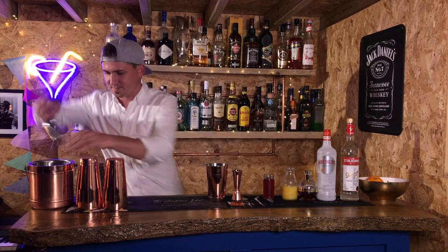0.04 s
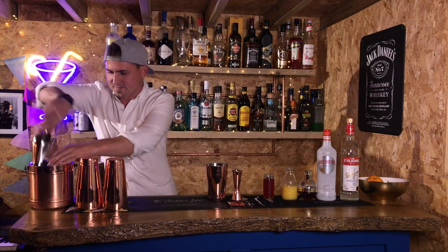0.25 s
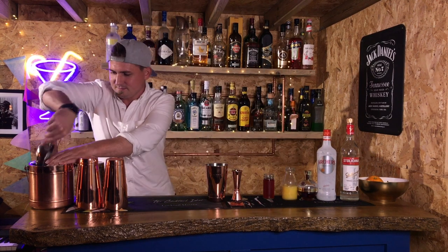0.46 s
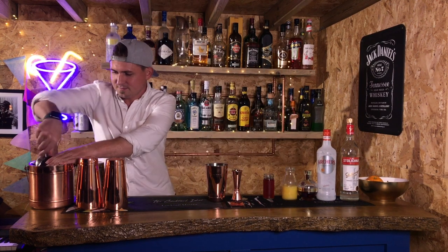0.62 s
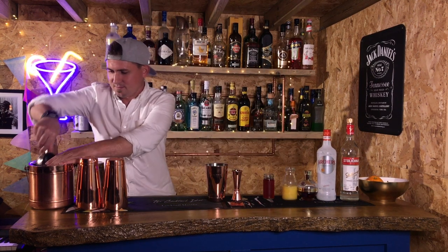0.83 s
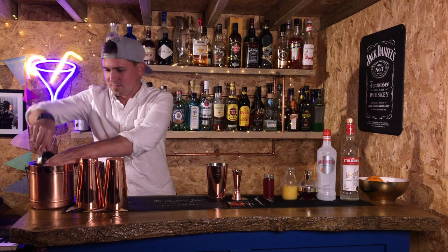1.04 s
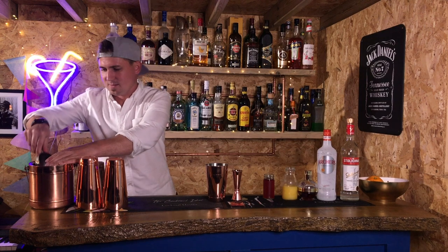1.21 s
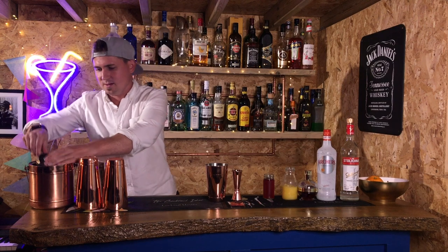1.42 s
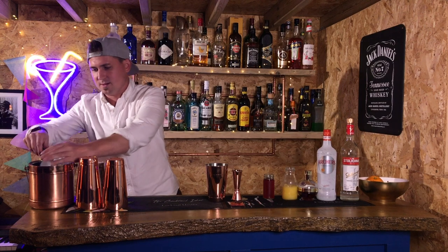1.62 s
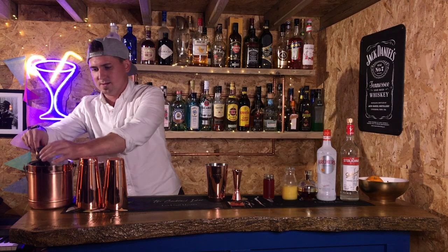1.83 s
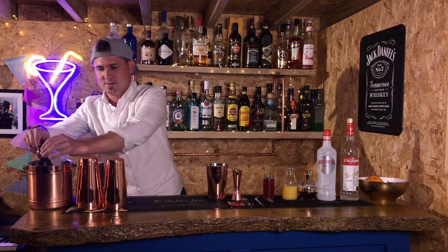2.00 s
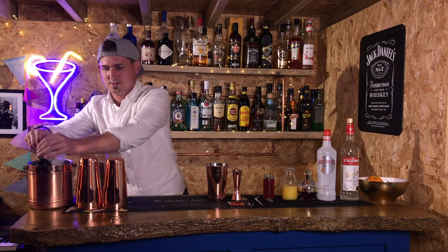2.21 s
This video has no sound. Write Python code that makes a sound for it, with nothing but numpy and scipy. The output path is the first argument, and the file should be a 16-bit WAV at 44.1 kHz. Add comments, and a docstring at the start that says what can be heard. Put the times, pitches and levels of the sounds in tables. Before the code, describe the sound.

Ice cubes clatter in a metal bucket as a steel scoop lands with a bright clang, digs through them with hollow thuds and tinkles, then eases off as the cubes settle. The sound is close, in a small bar.

```python
"""A steel scoop is plunged into a metal bucket of ice cubes in a small bar.
It lands with a bright clang, digs through the clattering cubes for a second and a half, and is lifted
as the last ones settle. Every contact mixes a hollow thud of the bucket, a clack of ice and a bright
crack of steel. Heavy blows boom, splinters tinkle, and the wooden counter bumps and rumbles."""
import sys
import numpy as np
from scipy import signal
from scipy.fft import rfft, irfft
from scipy.io import wavfile

SR = 44100
rng = np.random.default_rng(int(sys.argv[2]) if len(sys.argv) > 2 else 0)


def generate_wav(sig):
    """Save sig (samples, or channels by samples) to the path in sys.argv[1] as 16-bit PCM at SR."""
    pcm = np.round(np.clip(np.atleast_2d(sig).T, -1, 1) * 32767).astype(np.int16)
    wavfile.write(sys.argv[1], SR, pcm)


N = 103635
TIME = np.arange(N) / SR
AGE = TIME[:SR // 3]   # seconds since a contact
TOP_HZ = 15800

def from_db(db):
    """Turn decibels into a volume factor."""
    return 10 ** (np.asarray(db) / 20)

def unit_power(x):
    """Scale a signal to an average power of one."""
    return x / np.sqrt(np.mean(x ** 2) + 1e-20)

def noise(colour, size):
    """Noise shaped by a colour: a list of how strong each frequency is."""
    hz, db = np.transpose(colour)
    gain = from_db(np.interp(np.log(np.fft.rfftfreq(size, 1 / SR) + 1), np.log(hz), db))
    return unit_power(irfft(rfft(rng.standard_normal(size)) * gain, size))

def fade(fade_s):
    """Die away by 60 dB in the given fade time."""
    return from_db(-60 * AGE / fade_s)

def add(track, start, sound):
    """Mix a sound in at a start time in seconds."""
    i = int(start * SR)
    track[i:i + len(sound)] += sound[:max(N - i, 0)]

def band(x, low_hz, high_hz):
    """Soften everything outside a frequency range."""
    return signal.sosfilt(signal.butter(2, [low_hz, high_hz], "band", fs=SR, output="sos"), x)

def tones(table):
    """The fading tones of a struck object, one per row; together they start at a power of one."""
    power = sum(from_db(db) ** 2 for _, db, _ in table) / 2
    waves = [from_db(db) * np.sin(2 * np.pi * hz * AGE) * fade(fade_s) for hz, db, fade_s in table]
    return np.array(waves) / np.sqrt(power)

def strike(body):
    """Each contact sets an object's tones ringing in a mix of its own."""
    return (rng.choice([-1, 1], len(body)) * rng.uniform(.5, 1.5, len(body))) @ body

def ring_out(hits, table):
    """Metal rings with all its tones after each hit."""
    out, body = np.zeros(N), tones(table)
    for start, db in hits:
        add(out, start, from_db(db) * (rng.choice([-1, 1], len(body)) @ body))
    return out

# Each row: frequency in Hz, relative level in dB.
HUSH_COLOUR = [(22, -30), (70, -1), (161, 0), (499, -10), (9220, -13), (16000, -19)]
# Each row: time in seconds, level in dB.
HUSH_LEVELS = [(0, -50), (.23, -47.5), (2.3, -57)]
def room_hush():
    """The room's faint background noise swells a little, then sinks."""
    return from_db(np.interp(TIME, *np.transpose(HUSH_LEVELS))) * noise(HUSH_COLOUR, N)

# Each row: start in seconds, level in dB.
BUMPS = [(.05, -34), (.075, -35), (.909, -21), (1.7655, -24)]
# Each row: frequency in Hz, relative level in dB.
BUMP_COLOUR = [(25, -23), (150, 0), (300, -3), (750, -10), (4000, -55)]
def bumps(fade_s=.09, rise_s=.002):
    """The bucket shifts on the wooden counter with dull bumps."""
    out = np.zeros(N)
    envelope = fade(fade_s) * (1 - np.exp(-AGE / rise_s))
    for start, db in BUMPS:
        add(out, start, from_db(db) * noise(BUMP_COLOUR, len(AGE)) * envelope)
    return band(out, 65, 3000)

# Each row: start in seconds, level in dB.
CLANGS = [(.2422, -15), (.3935, -33), (1.4695, -30), (2.0605, -39)]
# Each row: pitch in Hz, relative level in dB, fade time in seconds.
SCOOP_TONES = [(640, -3, .09), (880, 0, .08), (1410, -1, .22), (1911, -7.5, .39), (2309, -.5, .55),
               (3989, -7, .33), (4301, -8, .36), (7284, -3, .2), (9281, -2, .18), (11360, -8, .13)]
def scoop_clangs():
    """The scoop's steel blade is struck and rings out."""
    return ring_out(CLANGS, SCOOP_TONES)

# Each row: start in seconds, pitch in Hz, level in dB.
BOOMS = [(.2422, 535, -26), (.761, 482, -16), (.911, 436, -15.5), (1.032, 424, -17), (1.129, 490, -21),
         (1.256, 460, -19), (1.7655, 425, -15)]
def booms(fade_s=.19):
    """A heavy blow makes the air in the bucket boom, lower when the scoop is deep in it."""
    out = np.zeros(N)
    for start, hz, db in BOOMS:
        add(out, start, from_db(db) * tones([(hz, 0, fade_s)])[0])
    return out

def cube_clink(hz, db=3, fade_s=.03):
    """One ice cube rings briefly at its own pitch."""
    return from_db(db) * tones([(hz, 0, fade_s)])[0]

def cube_glints(hz, db=-1.5, fade_s=.05):
    """Five glassy overtones of one cube, scattered above its pitch."""
    pitches = hz + rng.uniform(1000, 10000, 5)
    return from_db(db) * tones([(pitch, 0, fade_s) for pitch in pitches]).sum(axis=0)

def steel_shimmer(count=130, db=-4, fade_s=.2):
    """The scoop's highest tones among a crowd of others that thins out towards the top."""
    pitches = np.exp(rng.uniform(np.log(2600), np.log(15000), count))
    return tones(list(SCOOP_TONES[5:]) + [(hz, db, fade_s) for hz in pitches])

# The loud contacts. Each row: start in seconds, crushing time in seconds,
# thud, clack and crack levels in dB (before each part's offset), cube pitch in Hz.
KNOCKS = [(0.2422, 0.006, -42, -13, -7.5, 2300), (0.365, 0.001, -38, -24, -28, 1300),
          (0.3935, 0.01, -25, -19, -13, 930), (0.44, 0.005, -23, -22, -22, 710),
          (0.486, 0.004, -31, -14, -13, 1380), (0.5072, 0.003, -34, -16, -12, 1960),
          (0.541, 0.006, -25, -17, -12, 1160), (0.7112, 0.01, -26, -20, -14, 1160),
          (0.761, 0.003, -16, -14, -25, 1340), (0.878, 0.003, -29, -13, -26, 1210),
          (0.893, 0.005, -26, -15, -19, 2750), (0.911, 0.004, -14, -21, -25, 1010),
          (0.965, 0.004, -22, -18, -21, 1890), (1.032, 0.004, -15, -26, -19, 710),
          (1.128, 0.009, -18, -13, -15, 1310), (1.214, 0.004, -28, -17, -21, 1400),
          (1.256, 0.004, -18, -16, -25, 1290), (1.294, 0.003, -25, -14, -22, 1360),
          (1.363, 0.01, -43, -23, -15, 2020), (1.417, 0.004, -21, -17, -28, 2090),
          (1.4695, 0.008, -36, -18, -13, 1230), (1.536, 0.003, -42, -20, -32, 900),
          (1.56, 0.002, -38, -27, -23, 1230), (1.635, 0.01, -33, -28, -24, 1230),
          (1.711, 0.005, -31, -13, -22, 1280), (1.765, 0.005, -14, -11, -14, 1980),
          (1.88, 0.006, -51, -28, -27, 2000), (1.9868, 0.0025, -46, -10, -14, 2420),
          (2.0598, 0.005, -30, -18, -34, 800), (2.126, 0.003, -40, -27, -27, 1460),
          (2.212, 0.004, -46, -29, -36, 1550), (2.2745, 0.0015, -52, -22, -44, 2100)]
def knocks(part, colour, body, levels_db, clink, typical_crush_s=.005):
    """Ice crushes for a moment, then the metal rings on; a longer crush rings more."""
    rise_s, fade_s, ring_db, offset_db = part[:4]
    out = np.zeros(N)
    for (start, crush_s, *_, hz), db in zip(KNOCKS, levels_db):
        stretch = np.sqrt(crush_s / typical_crush_s)
        hold_then_fade = np.interp(AGE - crush_s, AGE, fade(fade_s * stretch))
        ringing = from_db(ring_db) * stretch * strike(body)
        crunch = noise(colour, len(AGE)) * hold_then_fade
        sound = (crunch + ringing + clink(hz)) * (1 - np.exp(-AGE / rise_s))
        onset = sound[AGE < crush_s + .003]
        add(out, start, from_db(db + offset_db) * sound / np.sqrt(np.mean(onset ** 2)))
    return out

# How loudly the ice stirs. Each row: time in seconds, then thud, clack and crack levels in dB
# (before each part's offset).
JOSTLE = [(0.25, -52, -24, -15), (0.3, -52, -33, -28), (0.38, -40, -32, -36), (0.41, -29, -22, -18),
          (0.53, -25, -21, -21), (0.6, -15, -13, -14), (0.69, -29, -23, -25), (0.74, -22, -18, -17),
          (0.89, -21, -15, -16), (0.96, -26, -22, -23), (1.04, -25, -20, -20), (1.25, -20, -16, -18),
          (1.34, -26, -23, -25), (1.43, -24, -18, -22), (1.51, -39, -29, -24), (1.66, -30, -24, -30),
          (1.83, -37, -29, -28), (1.93, -48, -37, -39), (2.02, -45, -28, -35), (2.1, -37, -33, -32),
          (2.18, -47, -37, -44), (2.24, -41, -36, -40), (2.31, -47, -46, -53), (2.35, -41, -33, -35)]
def jostle(part, colour, body, levels_db, clink, kinds=40, fade_s=.02, spread_db=3.2):
    """Cubes of many sizes tap many spots on the metal at random moments."""
    rise_s, _, _, _, offset_db, per_s, ring_db = part[:7]
    taps = []
    for hz in np.geomspace(660, 2700, kinds):
        tap = noise(colour, len(AGE)) * fade(fade_s) + from_db(ring_db) * strike(body) + clink(hz)
        tap *= 1 - np.exp(-AGE / rise_s)
        taps.append(tap / np.linalg.norm(tap))
    times, out = np.transpose(JOSTLE)[0], np.zeros(N)
    lag, size, kind, sign = rng.random((N // 20, 4)).T
    starts = times[0] + (np.arange(len(lag)) + 2 * lag) / per_s
    strengths = unit_power(from_db(spread_db * np.minimum(-np.log(size), 2)))
    gains = strengths * np.sign(sign - .5) * np.sqrt(SR / per_s)
    gains *= from_db(np.interp(starts, times, levels_db) + offset_db)
    for start, gain, k in zip(starts[starts < TIME[-1]], gains, (kind * kinds).astype(int)):
        add(out, start, gain * taps[k])
    return out

# The bucket's hollow (first five rows) and wall (the rest).
# Each row: pitch in Hz, relative level in dB, fade time in seconds.
BUCKET_TONES = [(425, -1, .2), (460, 0, .16), (489, 0, .18), (515, 0, .24), (566, -4, .22), (717, -6, .18),
                (1120, -3, .2), (1205, 0, .28), (1281, 1, .26), (1340, -3, .24), (1476, -3, .22),
                (1612, -6, .22), (1889, 0, .25)]
# The noise in each part of a contact. Each row: frequency in Hz, relative level in dB.
THUD_COLOUR = [(150, -22), (340, -10), (430, 0), (500, 0), (620, -8), (1400, -35)]
CLACK_COLOUR = [(350, -22), (560, 1), (750, -1), (1000, -6), (1300, 1), (1620, -4), (1950, 0), (2400, -8),
                (3300, -11), (6000, -45)]
CRACK_COLOUR = [(1500, -14), (2700, 2), (3900, 3), (6600, -2), (9500, 0), (12500, -4.5), (16000, -8.5)]
# Each part lists: rise time in seconds, a typical knock's fade time in seconds and ringing in dB,
# knock offset in dB, jostle offset in dB, taps per second, their ringing in dB, low and high edge in Hz.
THUD_PART = (.001, .038, -14, -1.3, -3.6, 170, -15, 400, 590)
CLACK_PART = (.0005, .028, -15, -.9, -4.7, 560, -12.5, 450, 4500)
CRACK_PART = (.0005, .055, -20.5, -1.2, -4.1, 700, -16.5, 1600, 19000)
def ice_clatter():
    """Knocks and jostling: the bucket's hollow thuds, its wall and the cubes clack, the scoop cracks."""
    parts = [(THUD_PART, THUD_COLOUR, tones(BUCKET_TONES[:5]), np.zeros_like),   # no clink
             (CLACK_PART, CLACK_COLOUR, tones(BUCKET_TONES[5:]), cube_clink),
             (CRACK_PART, CRACK_COLOUR, steel_shimmer(), cube_glints)]
    knock_db, jostle_db = np.transpose(KNOCKS)[2:5], np.transpose(JOSTLE)[1:]
    out = np.zeros(N)
    for k, (part, colour, body, clink) in enumerate(parts):
        loud = knocks(part, colour, body, knock_db[k], clink)
        small = jostle(part, colour, body, jostle_db[k], clink)
        out += band(loud + small, *part[-2:])
    return out

# Each row: frequency in Hz, relative level in dB.
RUMBLE_COLOUR = [(25, -38), (85, -3), (150, -3), (270, 5), (600, -10), (2000, -60)]
def counter_rumble(offset_db=-23.5, follow=.6):
    """Once the scoop lands, the counter rumbles, partly following the jostling thuds."""
    times, thud_db, *_ = np.transpose(JOSTLE)
    level_db = offset_db + follow * np.interp(TIME, times, thud_db)
    return from_db(level_db) * noise(RUMBLE_COLOUR, N) * (TIME > CLANGS[0][0])

def tinkles(per_s=70, offset_db=-9.5, fade_s=.05, low_hz=2800, high_hz=12000):
    """Ice splinters ping at high pitches of their own, louder when the ice is stirred harder."""
    times, *_, crack_db = np.transpose(JOSTLE)
    out = np.zeros(N)
    for k, (lag, pitch, size) in enumerate(rng.random((N // 200, 3))):
        start = times[0] + (k + lag) / per_s
        if start < TIME[-1]:
            hz = low_hz * (high_hz / low_hz) ** pitch
            gain = 2 * size * from_db(np.interp(start, times, crack_db) + offset_db)
            add(out, start, gain * tones([(hz, 0, fade_s)])[0])
    return out

# Each row: start in seconds, level in dB.
WALL_HITS = [(1.128, -26), (1.712, -22), (1.7655, -19)]
def wall_hits():
    """The scoop hits the bucket's wall, which rings on."""
    return ring_out(WALL_HITS, BUCKET_TONES[5:])

def room_echo(x, db=-7.8, fade_s=.34, rise_s=.005):
    """Sound bounces around a small wood-lined room and blurs into a short tail."""
    tail = rng.standard_normal(len(AGE)) * fade(fade_s) * (1 - np.exp(-(AGE / rise_s) ** 2))
    return from_db(db) * signal.fftconvolve(x, tail / np.linalg.norm(tail))[:N]

def scene(drier_from_s=1.93, drier_db=-1.5):
    """Scoop, ice and bucket in the room; the last knocks sound slightly drier, with less room echo."""
    metal = band(scoop_clangs() + wall_hits() + booms(), 240, TOP_HZ)
    direct = ice_clatter() + counter_rumble() + tinkles() + metal + bumps()
    echo = room_echo(direct * from_db(drier_db * (TIME > drier_from_s)))
    return (direct + echo + room_hush())[None]

def record(dry, ceiling=1.3):
    """Round off the tallest peaks and cut the very highest treble."""
    rounded = ceiling * np.tanh(dry / ceiling)
    return signal.sosfilt(signal.ellip(12, .1, 80, TOP_HZ, fs=SR, output="sos"), rounded)

dry = scene()
out = record(dry)
generate_wav(out)
```